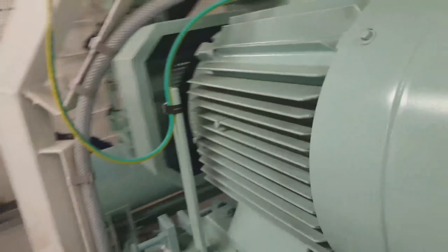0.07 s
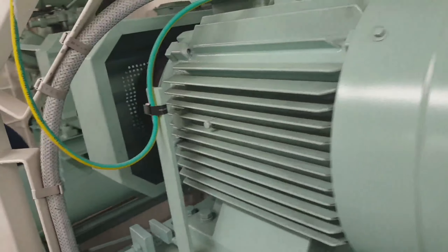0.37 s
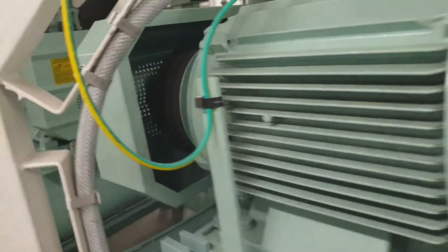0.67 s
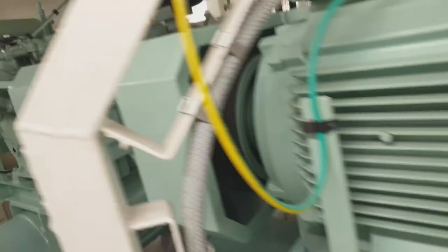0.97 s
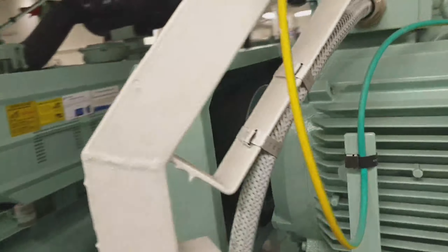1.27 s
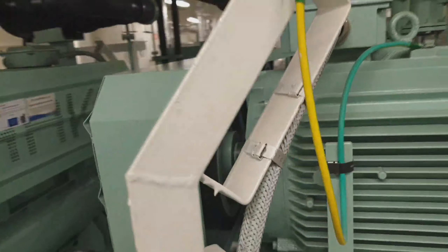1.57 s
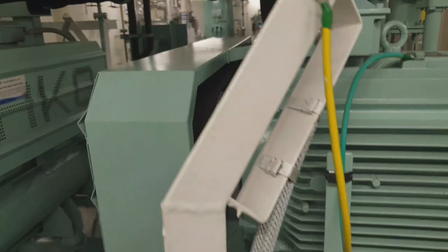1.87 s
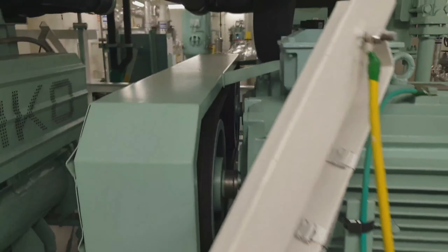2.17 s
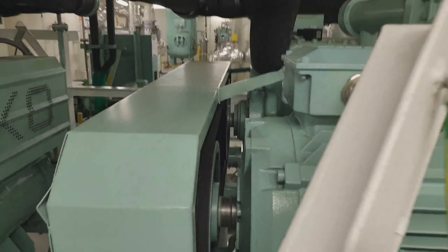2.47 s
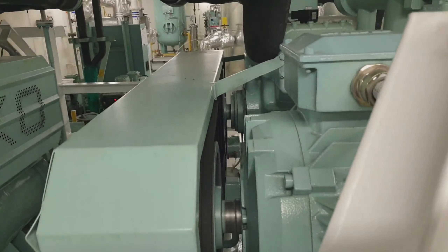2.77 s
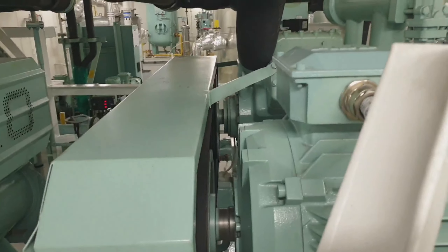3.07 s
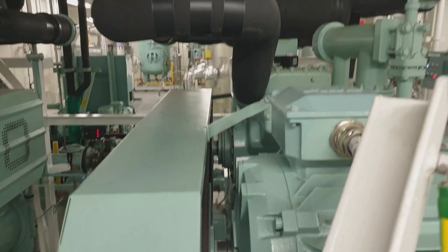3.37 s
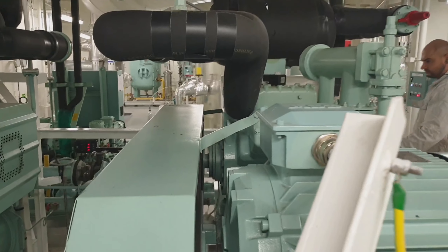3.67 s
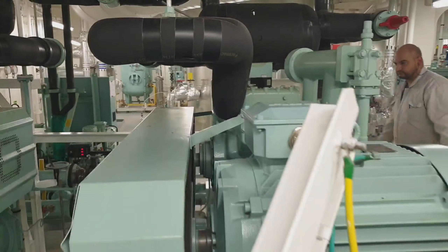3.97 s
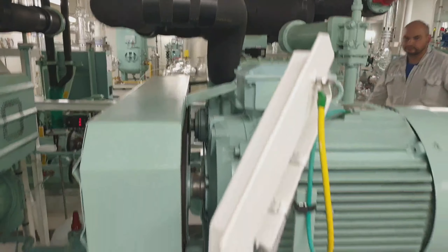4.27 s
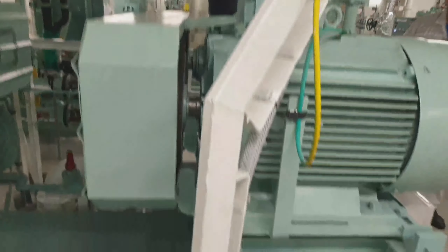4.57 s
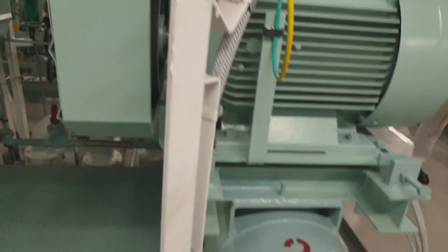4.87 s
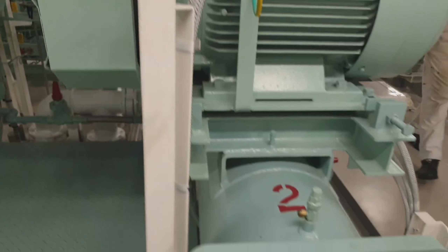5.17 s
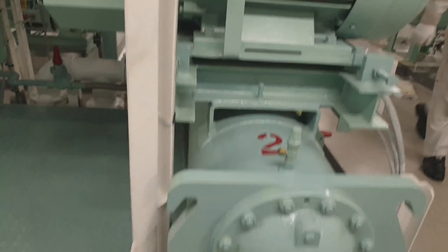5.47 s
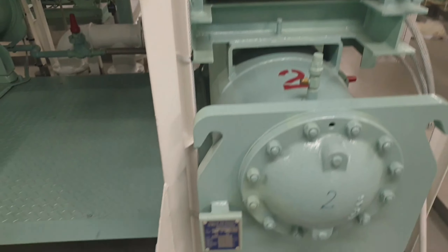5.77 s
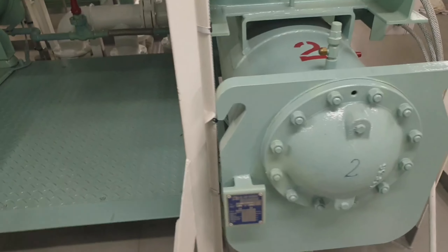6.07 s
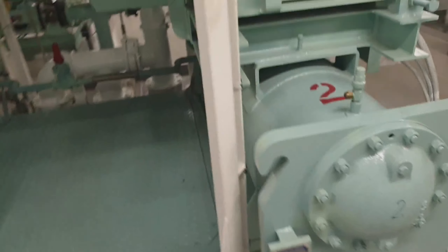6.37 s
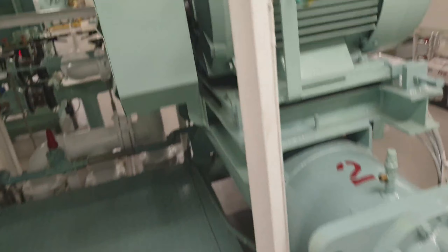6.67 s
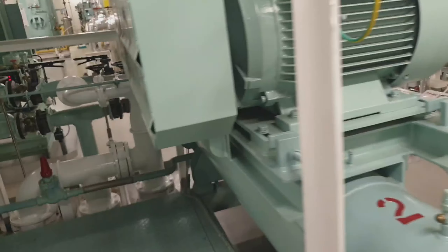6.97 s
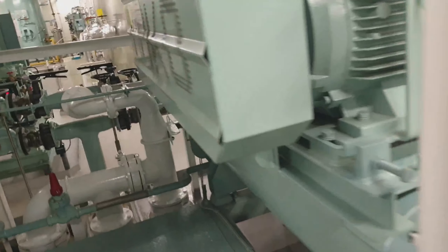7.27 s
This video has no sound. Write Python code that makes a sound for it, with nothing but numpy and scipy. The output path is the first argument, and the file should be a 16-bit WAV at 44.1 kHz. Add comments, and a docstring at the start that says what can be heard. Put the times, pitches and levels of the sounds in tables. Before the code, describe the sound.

A belt-driven piston compressor and its big electric motor run steadily in an enclosed plant room. A deep hum throbs a few times a second over the low roar of fan air, while rapid valve ticking blends with a high gas hiss and faint belt squeaks. As the microphone is carried around the machine, single tones and thin whines swell and fade, and the metallic clatter brightens now and then.

```python
"""A plant room: a belt-driven piston compressor and its big electric motor run steadily.
The motor hums on its shaft orders and throbs against a neighbouring machine; the slower crank adds
its own orders. Eight valves tick on every turn, ringing the heads and the room, over rushing gas,
fan air and faintly squeaking belts. The microphone is carried along, so single tones swell and fade
in the standing waves, and valve ring comes through gaps in the guards."""
import sys
import numpy as np
from scipy import signal
from scipy.fft import rfft, irfft
from scipy.io import wavfile

SR = 44100
rng = np.random.default_rng(int(sys.argv[2]) if len(sys.argv) > 2 else 0)


def generate_wav(signal):
    """Clip the signal to [-1, 1] and save it as 16-bit WAV at the path in sys.argv[1]."""
    frames = np.transpose(np.atleast_2d(signal))
    scaled = np.clip(frames, -1, 1) * 32767
    pcm = np.round(scaled).astype(np.int16)
    wavfile.write(sys.argv[1], SR, pcm)


N = 331632
TIME = np.arange(N) / SR
BIN_HZ = np.arange(N // 2 + 1) * SR / N
MOTOR_HZ, CRANK_HZ = 29.63, 26.237


def from_db(db):
    """Decibels to gain."""
    return 10 ** (np.asarray(db) / 20)


def unit_rms(x):
    """Scale to unit power."""
    return x / np.sqrt(np.mean(x ** 2) + 1e-20)


def envelope(curve):
    """Gain per sample from rows of t/s, level/dB."""
    return from_db(np.interp(TIME, *np.transpose(curve)))


def swell(centre_s, half_s):
    """Raised-cosine rise and fall."""
    return np.cos(np.pi / 2 * np.clip((TIME - centre_s) / half_s, -1, 1)) ** 2


def colour(x, spectrum):
    """Filter by rows of f/Hz, level/dB, interpolated in log frequency."""
    hz, db = np.transpose(spectrum)
    gain = from_db(np.interp(np.log(np.maximum(BIN_HZ, 1)), np.log(hz), db))
    return irfft(rfft(x) * gain, N)


def noise(spectrum):
    """Mid and side noise of the given spectral density."""
    return colour(rng.standard_normal((2, N)) * np.sqrt(SR / 2), spectrum)


def drift(rate_hz):
    """Smooth random curve of unit spread."""
    hop, settle = 100, 2000
    pole = np.exp(-2 * np.pi * rate_hz * hop / SR)
    white = rng.standard_normal(N // hop + settle + 2)
    slow = signal.lfilter([1], [1, -2 * pole, pole ** 2], white)[settle:]
    return np.interp(np.arange(N) / hop, np.arange(len(slow)), unit_rms(slow - slow.mean()))


def shimmer(x, depth_db, rate_hz, bands=12):
    """Each half octave above 250 Hz flickers on its own; the bass stays even."""
    band = np.clip(2 * np.log2(np.maximum(BIN_HZ, 1) / 250), 0, bands - 1)
    spectrum = rfft(x)
    bass, *upper = (irfft(spectrum * np.maximum(1 - np.abs(band - k), 0), N) for k in range(bands))
    return bass + sum(part * from_db(depth_db * drift(rate_hz)) for part in upper)


def tone(cycles, fade_db, fade_hz):
    """Unit-rms sine; mid and side fade separately as the microphone moves."""
    sine = np.sin(2 * np.pi * (cycles + rng.random((2, 1))))
    fade = from_db(fade_db * np.array([drift(fade_hz), drift(fade_hz)]))
    return unit_rms(fade * sine)


def shaft_turns(hz, wander):
    """Running turn count of a shaft whose speed wanders with the load."""
    return np.cumsum(hz * (1 + wander * drift(0.92))) / SR


# Deep hum, motor order 2: t/s, level/dB
HUM_LEVEL = [(0, -45), (1, -44.5), (2.4, -46), (3.4, -45.5), (4.4, -46.5), (5.7, -44), (6.5, -43.5),
             (7.5, -44)]

def hum(motor, beat_hz=3.1, rise_hz_per_s=.092, crest_s=.8, neighbour_db=-61.5):
    """The motor beats with a neighbouring machine; the throb quickens as their speeds part."""
    age = TIME - crest_s
    lead = beat_hz * age + rise_hz_per_s * age ** 2 / 2
    cycles = 2 * motor + rng.random((2, 1))
    own = np.sin(2 * np.pi * cycles) * from_db(.5 * drift(16))
    neighbour = np.sin(2 * np.pi * (cycles + lead)) * from_db(2 * drift(1.1))
    return envelope(HUM_LEVEL) * unit_rms(own) + from_db(neighbour_db) * unit_rms(neighbour)


# Weaker shaft harmonics: order, level/dB
MOTOR_ORDERS = [(1, -77), (3, -63.5), (5, -62.5), (9, -72), (10, -69), (11, -69), (12, -70), (13, -69),
                (16, -73.5), (21, -74), (23, -78.5), (26, -81), (27, -74.5)]
CRANK_ORDERS = [(6, -64), (9, -80), (12, -70.5), (14, -72), (20, -68.5), (22, -69.5), (24, -78),
                (28, -77.5), (30, -74.5)]
# Other plant: f/Hz, level/dB
PLANT_DRONES = [(111.9, -62), (194.1, -76), (500.1, -71), (824.1, -77)]

def drone(motor, crank):
    """Weaker orders of both shafts and the other plant beat against each other."""
    out = sum(from_db(db) * tone(k * motor, fade_db=3, fade_hz=1) for k, db in MOTOR_ORDERS)
    out += sum(from_db(db) * tone(k * crank, fade_db=.5, fade_hz=.44) for k, db in CRANK_ORDERS)
    out += sum(from_db(db) * tone(hz * TIME, fade_db=.5, fade_hz=.63) for hz, db in PLANT_DRONES)
    return out


# Shaft orders along the walk: t/s, level/dB
MOTOR_4TH = [(0.0, -62.5), (1.0, -49), (1.3, -55.5), (2.6, -51), (3.7, -58.5), (4.0, -49.5), (4.4, -55),
             (4.9, -48), (5.5, -51), (5.8, -46.5), (7.5, -57)]
MOTOR_6TH = [(0, -70), (2, -67), (3.6, -61.5), (4.5, -68), (5.8, -62.5), (7.5, -60.5)]
MOTOR_7TH = [(0.0, -63.5), (0.899, -60.5), (3.2, -59), (4.7, -66), (5.2, -61), (5.8, -63), (7.5, -65)]
MOTOR_8TH = [(0, -68), (3.3, -63), (4.3, -61.5), (5.5, -69.5), (6.3, -60.5), (7.5, -69.5)]
MOTOR_14TH = [(0, -72), (2.8, -74), (3.4, -68), (4.2, -71), (5.1, -64.5), (6.7, -65.5), (7.5, -66)]
MOTOR_15TH = [(0.0, -76), (1.0, -69), (1.5, -61.5), (2.2, -63), (3.1, -69), (4.5, -62), (5.5, -78),
              (6.1, -74), (7.5, -68)]
MOTOR_17TH = [(0.0, -64.5), (0.8, -73), (1.5, -63), (2.1, -61.5), (2.4, -70), (3.4, -62), (3.8, -78),
              (4.4, -61.5), (4.9, -61), (6.0, -60.5), (7.0, -65), (7.5, -77)]
MOTOR_18TH = [(0, -73), (2.2, -73), (3.6, -80), (4.1, -66.5), (5, -70.5), (6.7, -69), (7.5, -70)]
MOTOR_19TH = [(0.0, -81), (0.8, -68), (1.7, -59), (2.4, -68), (2.9, -66), (3.7, -68), (4.1, -65),
              (4.8, -65), (5.5, -70), (6.8, -63.5), (7.5, -72)]
CRANK_21ST = [(0.0, -80), (1.4, -70), (2.1, -64), (2.4, -61), (4.4, -62), (5.1, -72), (5.7, -71),
              (6.3, -63), (6.6, -85), (7.3, -58.5)]
# Other plant, loudest low by the frame: t/s, level/dB
FRAME_DRONE = [(0, -94), (4.3, -71), (4.8, -60.5), (5.5, -64), (6.2, -59.5), (7.0, -66), (7.5, -72)]

def standing_waves(motor, crank, frame_drone_hz=489.3):
    """Strong shaft orders and one drone, each swelling and fading through its own room pattern."""
    orders = {4: MOTOR_4TH, 6: MOTOR_6TH, 7: MOTOR_7TH, 8: MOTOR_8TH, 14: MOTOR_14TH,
              15: MOTOR_15TH, 17: MOTOR_17TH, 18: MOTOR_18TH, 19: MOTOR_19TH}
    partials = [(k * motor, level) for k, level in orders.items()]
    partials += [(21 * crank, CRANK_21ST), (frame_drone_hz * TIME, FRAME_DRONE)]
    return sum(envelope(level) * tone(cycles, fade_db=.5, fade_hz=2.5) for cycles, level in partials)


# Thin high whines and steady ringing tones of the valve clatter: f/Hz, waver/Hz, level/dB
WHINES = [(1304, 1.5, -77.5), (1428, 1.9, -84), (1472, 3.9, -80), (2098, 3, -84), (2225, 6.1, -81),
          (2730, 3, -83), (3858, 8, -80), (4301, 5, -77), (4355, 5, -80), (4565, 5, -80), (4619, 5, -80.5),
          (4856, 5, -80), (5011, 4, -78.5), (5378, 5, -82)]

def whines():
    """Thin high tones waver in pitch and come and go within a few steps."""
    out = 0
    for hz, waver_hz, db in WHINES:
        cycles = np.cumsum(hz + waver_hz * drift(10.3)) / SR
        out += from_db(db) * tone(cycles, fade_db=2.5, fade_hz=3.7)
    return out


# Fan air and room roar: f/Hz, level/dB
AIR_SPECTRUM = [(22, -89), (35, -89), (48, -70.5), (80, -76.5), (135, -72), (175, -80.5), (300, -80.5),
                (400, -86), (560, -86.5), (820, -88), (1050, -91), (1650, -96.5), (2600, -100),
                (5000, -120)]

def fan_air():
    """Low roar whose treble shimmers as the air shifts."""
    return shimmer(noise(AIR_SPECTRUM), depth_db=2.1, rate_hz=31)


# Boom shape: f/Hz, level/dB
BOOM_SPECTRUM = [(80, -42), (115, -6), (137, -3), (155, 4), (190, -42)]
# Boom along the walk: t/s, level/dB
BOOM_LEVEL = [(0, -77), (.7, -68), (1.25, -61), (1.9, -74), (3.8, -73), (4.3, -67), (4.75, -57), (5.3, -62),
              (6.2, -71), (7.5, -62)]

def room_boom():
    """The room booms at about 115-155 Hz in its corners."""
    return envelope(BOOM_LEVEL) * unit_rms(noise(BOOM_SPECTRUM))


# Valves in firing order: place/turn, level/dB
VALVES = [(0, 12), (.126, 13.5), (.249, -4.5), (.377, 3.5), (.501, 8.5), (.624, -23), (.752, 7), (.874, -4)]

def valve_ticks(crank, path_spread_turns=.012, jitter_s=5e-6, uneven_db=.6):
    """One click per valve per turn, shifted a little by its path to the microphone."""
    place, level_db = np.transpose(VALVES)
    place = place + path_spread_turns * rng.standard_normal(len(place))
    turn = np.arange(int(CRANK_HZ * N / SR) + 1)[:, None]
    tick_s = np.interp(turn + place, crank, TIME)
    tick_s += jitter_s * rng.standard_normal(tick_s.shape)
    samples = np.clip(np.round(tick_s * SR).astype(int), 0, N - 1)
    out = np.zeros(N)
    out[samples] = from_db(level_db + uneven_db * rng.standard_normal(tick_s.shape))
    return out


# Cylinder head response: f/Hz, level/dB
HEAD_RING = [(900, -18), (2300, -6.5), (3300, -15.5), (3900, -9), (4450, -1), (5250, -2.5), (5600, -11.5),
             (6600, -11.5), (7800, -38), (9000, -11.5), (11200, -8), (12800, -12.5), (14000, -25),
             (15000, -60)]

def valve_ring(crank, head_t60_s, room_db, room_t60_s=.82, positions=40):
    """Ticks ring the heads and the room; the echo pattern changes along the walk."""
    age = TIME[:SR // 4]
    head, room = 1000 ** (-age / head_t60_s), 1000 ** (-age / room_t60_s)
    decay = unit_rms(head) + from_db(room_db) * unit_rms(room)
    step, out = N // (positions - 1), np.zeros((2, N))
    for centre in range(0, N + step, step):
        first, last = max(centre - step, 0), min(centre + step, N)
        start = max(first - len(age), 0)  # earlier ticks still ring
        ticks = valve_ticks(crank)[None, start:last]
        echoes = decay * rng.standard_normal((2, len(age)))
        ring = signal.fftconvolve(ticks, echoes, axes=1)
        crossfade = np.cos(np.pi / 2 * (np.arange(first, last) - centre) / step)
        out[:, first:last] += crossfade * ring[:, first - start:last - start]
    return unit_rms(colour(out, HEAD_RING))


# Gas rush: f/Hz, level/dB
GAS_SPECTRUM = [(1500, -12), (2400, -3.5), (3300, -5), (4100, 1), (5200, -1), (6000, -7), (7800, -17),
                (9200, -10.5), (11200, -6), (12800, -18), (14000, -20), (15000, -56)]
# How openly the heads face the microphone: t/s, level/dB
HEADS_LEVEL = [(0, -65.5), (1.0, -60.5), (1.5, -62), (2.3, -61), (2.85, -60), (3.3, -59.5), (4.0, -60.5),
               (6.1, -62.5), (7.0, -62), (7.5, -61)]

def cylinder_heads(crank, gas_db=-.76, ticks_db=-4.06):
    """Gas rushes through the heads under the valve clatter; both shimmer as the microphone moves through the
    standing waves."""
    gas = from_db(gas_db) * unit_rms(noise(GAS_SPECTRUM))
    clatter = from_db(ticks_db) * valve_ring(crank, head_t60_s=.067, room_db=1)
    return envelope(HEADS_LEVEL) * shimmer(gas + clatter, depth_db=.75, rate_hz=10)


# Belts creaking in their grooves: t/s, level/dB
SQUEAK_LEVEL = [(0, -70.5), (.9, -67.5), (1.6, -66.5), (2.4, -65.5), (2.65, -73), (3.0, -73), (3.3, -71),
                (4.1, -67), (4.7, -66), (5.5, -68.5), (6.2, -70), (6.8, -69), (7.5, -65.5)]

def belt_squeaks(per_s=170, hz=4434, scatter_hz=387, glide_hz_per_s=22000, half_s=.006, uneven_db=2.1):
    """The belts slip at random; each slip is a brief whistle gliding up or down."""
    out, age = np.zeros((2, N)), np.arange(-SR // 40, SR // 40) / SR
    count = int(per_s * TIME[-1])
    for channel in out:
        starts = rng.integers(0, N - len(age), count)
        deviations = np.clip(rng.standard_normal((count, 4)), -2, 2)
        for start, (pitch, glide, length, size) in zip(starts, deviations):
            cycles = (hz + scatter_hz * pitch) * age + glide_hz_per_s * glide * age ** 2 / 2
            shape = from_db(uneven_db * size) * np.exp(-(age / (half_s * 2 ** (length / 2))) ** 2)
            channel[start:start + len(age)] += shape * np.sin(2 * np.pi * cycles)
    return envelope(SQUEAK_LEVEL) * unit_rms(out)


# Casing resonances passed on the walk: centre t/s, half length/s, f/Hz, width/Hz, level/dB
CASING_SPOTS = [(.17, .2, 1303, 3, -69), (.7, .27, 786, 6, -69.5), (.77, .09, 2729, 6, -69),
                (.82, .18, 1308, 7, -70), (1.03, .07, 2732, 8, -73), (1.05, .35, 4301, 8, -70),
                (1.2, .09, 2729, 6, -71), (1.6, .4, 2729, 7, -71), (2.32, .16, 2729, 6, -67.5),
                (2.95, .3, 1305, 6, -73.5), (3.13, .14, 2945, 9, -70), (3.42, .2, 2945, 10, -74),
                (3.65, .4, 2735, 8, -74), (3.5, .35, 1475, 8, -74.5), (3.4, .35, 2449, 10, -74),
                (3.88, .32, 2449, 9, -70.5), (3.85, .5, 3858, 12, -71), (4.57, .32, 1475, 9, -69),
                (4.85, .33, 2200, 70, -70), (5.52, .27, 1307, 5, -69), (6.2, .14, 1305, 7, -70),
                (6.33, .18, 2243, 20, -68), (7.0, .33, 1468, 9, -72.5)]

def casing_ring(ragged_db=2.2, ragged_hz=50):
    """Narrow resonances, shaken at random, ring raggedly; each is heard from one spot."""
    out = np.zeros((2, N))
    for centre_s, half_s, hz, width_hz, db in CASING_SPOTS:
        heard = np.abs(TIME - centre_s) < half_s
        gain = from_db(db) * np.sqrt(swell(centre_s, half_s)[heard])
        for channel in out:
            shake = (drift(width_hz) + 1j * drift(width_hz))[heard]
            shake /= np.sqrt(np.abs(shake))  # evens out the swings
            ring = np.real(shake * np.exp(2j * np.pi * hz * TIME[heard]))
            flutter = from_db(ragged_db * drift(ragged_hz)[heard])
            channel[heard] += gain * unit_rms(ring * flutter)
    return out


# Gaps in the guards: centre t/s, half length/s, f/Hz, width/Hz, level/dB
GUARD_GAPS = [(1.05, .6, 4600, 750, -62.3), (1.15, .45, 5150, 500, -67), (2.9, .4, 4640, 60, -73),
              (3.35, .5, 4480, 300, -66.5), (4.05, .8, 4330, 300, -67.5), (3.95, .8, 3900, 250, -67.5),
              (5.05, .4, 4050, 150, -69), (5.3, .6, 4950, 400, -70), (5.75, .4, 4560, 300, -66.5),
              (7.2, .6, 4550, 400, -71), (7.1, .35, 5000, 300, -70.5)]

def guard_gaps(crank, chatter_db=3, chatter_hz=22):
    """One band of valve ring swells and chatters as the microphone passes each gap."""
    ring = valve_ring(crank, head_t60_s=.073, room_db=17)
    out = 0
    for centre_s, half_s, hz, width_hz, db in GUARD_GAPS:
        band = signal.butter(2, [hz - width_hz / 2, hz + width_hz / 2], "band", fs=SR, output="sos")
        leak = signal.sosfilt(band, ring) * from_db(chatter_db * drift(chatter_hz))
        out += from_db(db) * swell(centre_s, half_s) * unit_rms(leak)
    return out


def turn_chirps(crank, place=.52, hz=4870, fall_hz_per_s=65000, scatter_hz=70, half_s=.0042, db=-53):
    """One short falling chirp per crank turn, heard briefly near 2.85 s."""
    age = ((crank - place + .5) % 1 - .5) / CRANK_HZ
    pitch_hz = hz - fall_hz_per_s * age + scatter_hz * np.array([drift(150), drift(150)])
    chirp = np.exp(-(age / half_s) ** 2) * np.sin(2 * np.pi * np.cumsum(pitch_hz, axis=1) / SR)
    return from_db(db) * np.sqrt(swell(centre_s=2.85, half_s=.33)) * chirp


# Nearness gain on hum, drone and fan air: t/s, level/dB
NEARNESS = [(0, -5), (.35, -3), (.7, -0.5), (1.2, -0.5), (2.5, -0.5), (4, -0.64), (5.2, -0.5), (6.5, -2),
            (7.5, -1.5)]
# Side relative to mid, wider at short wavelengths: f/Hz, level/dB
STEREO_WIDTH = [(60, -23), (120, -20.5), (200, -14.5), (370, -12), (690, -6.5), (1200, 0.5), (15000, -0.5)]

def scene():
    """Sum all sources as mid and side, then convert to left and right."""
    motor, crank = shaft_turns(MOTOR_HZ, wander=.0004), shaft_turns(CRANK_HZ, wander=.0003)
    heads, boom, air = cylinder_heads(crank), room_boom(), fan_air()
    leaks = guard_gaps(crank)
    machine = envelope(NEARNESS) * (hum(motor) + drone(motor, crank) + air)
    tones = standing_waves(motor, crank) + whines() + casing_ring()
    mid, side = machine + tones + boom + heads + leaks + turn_chirps(crank) + belt_squeaks()
    side = colour(side, STEREO_WIDTH)
    balance = from_db([[.3], [-.3]])
    return balance * np.array([mid + side, mid - side])


def record(dry, cutoff_hz=14750):
    """Steep low-pass."""
    return signal.sosfiltfilt(signal.ellip(10, .05, 70, cutoff_hz, fs=SR, output="sos"), dry)


dry = scene()
out = record(dry)
generate_wav(out)
```